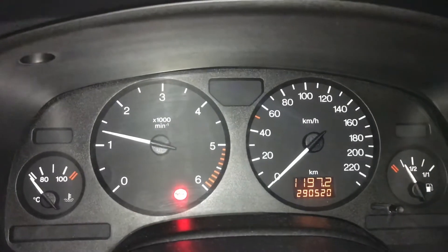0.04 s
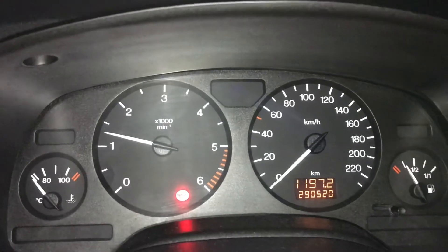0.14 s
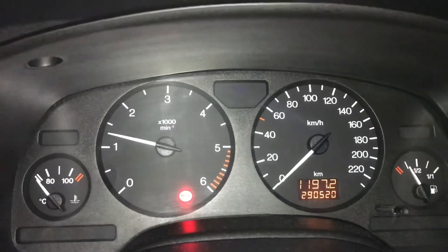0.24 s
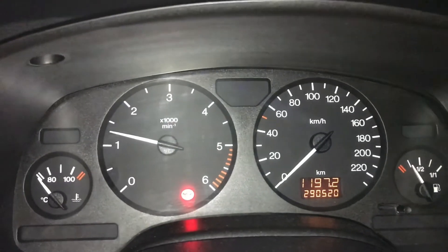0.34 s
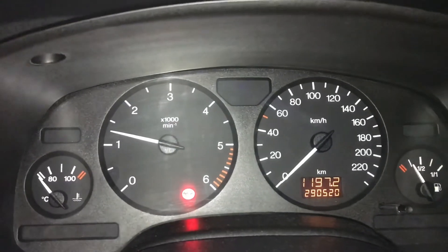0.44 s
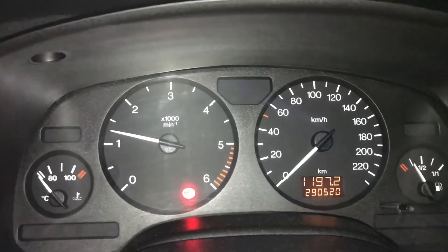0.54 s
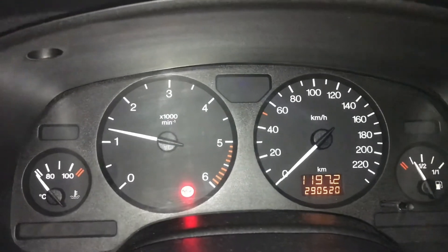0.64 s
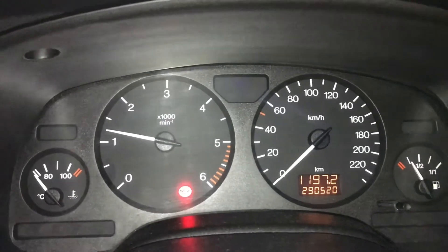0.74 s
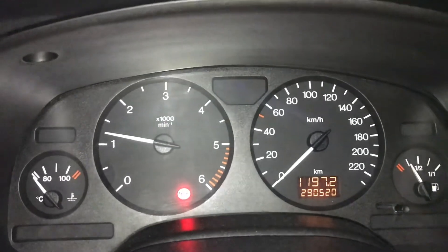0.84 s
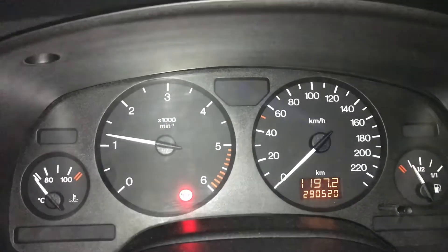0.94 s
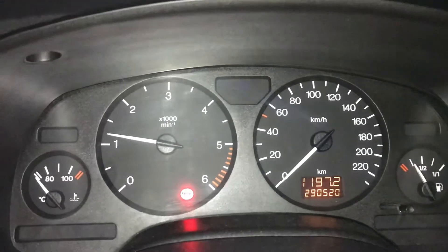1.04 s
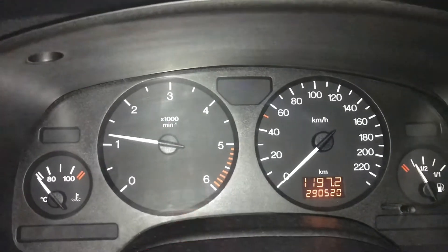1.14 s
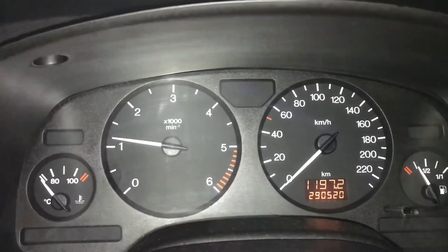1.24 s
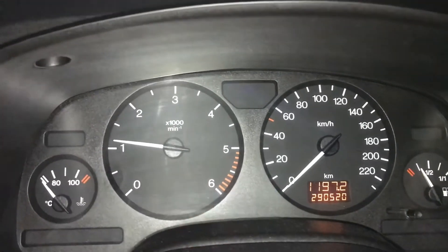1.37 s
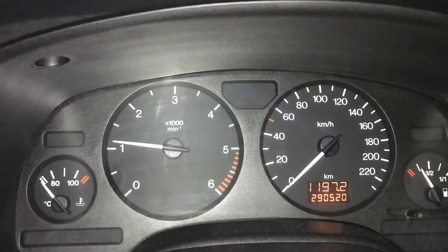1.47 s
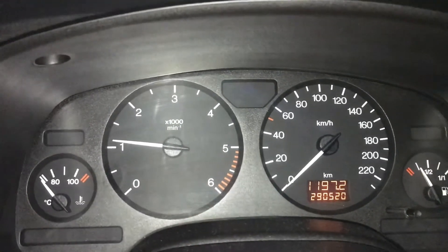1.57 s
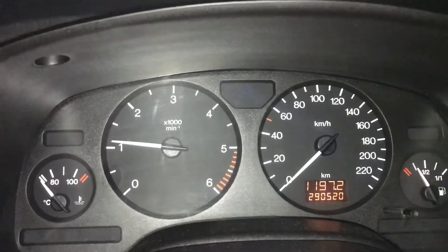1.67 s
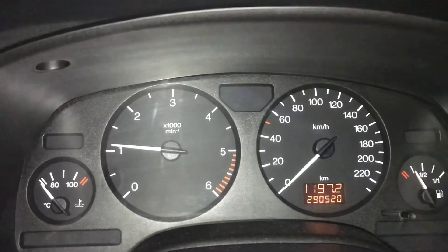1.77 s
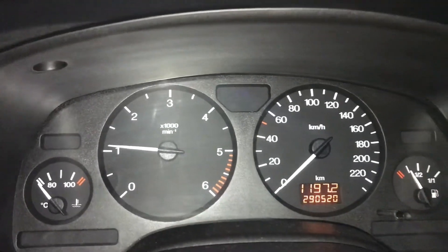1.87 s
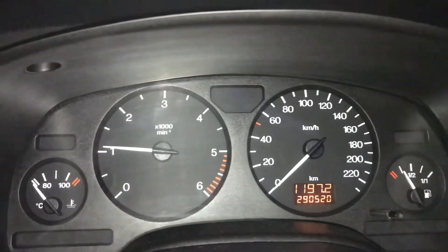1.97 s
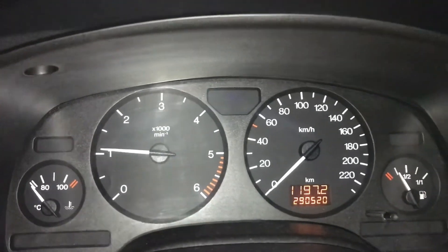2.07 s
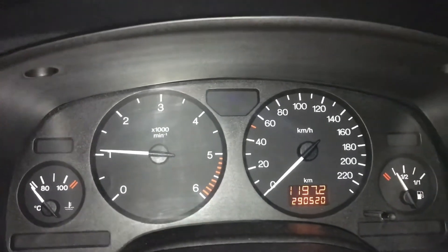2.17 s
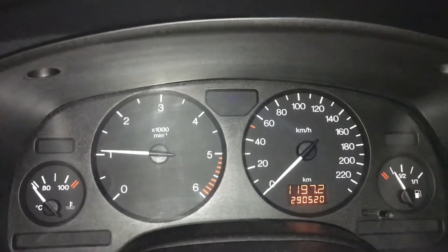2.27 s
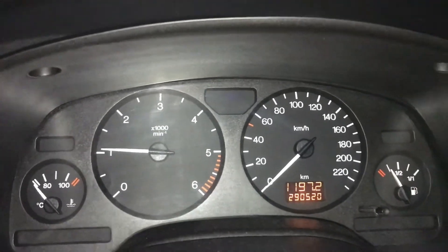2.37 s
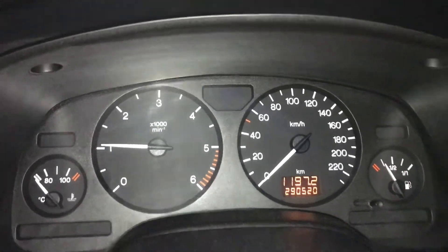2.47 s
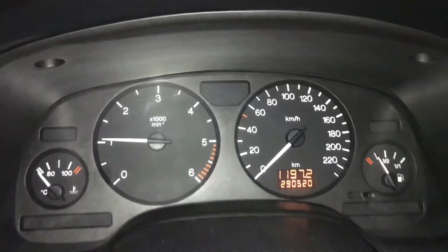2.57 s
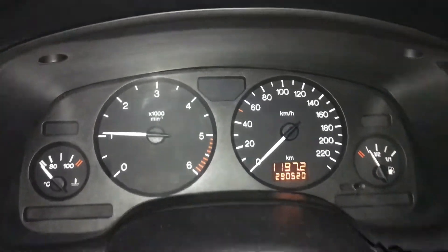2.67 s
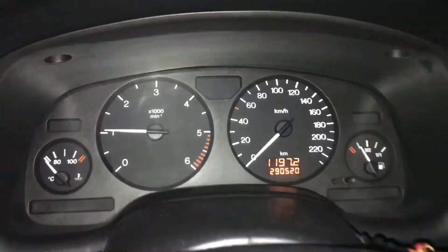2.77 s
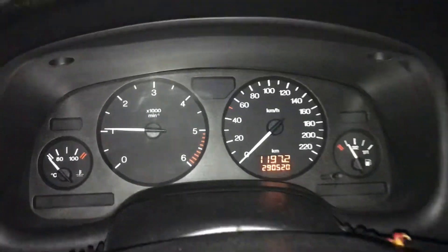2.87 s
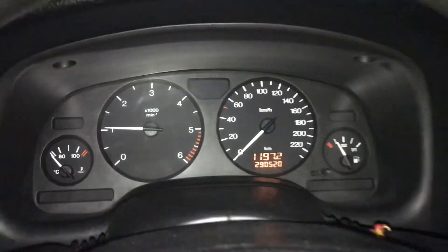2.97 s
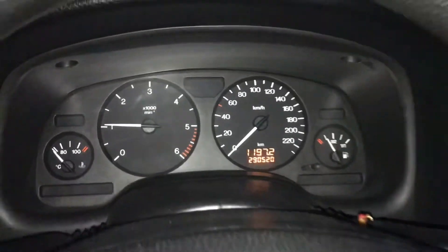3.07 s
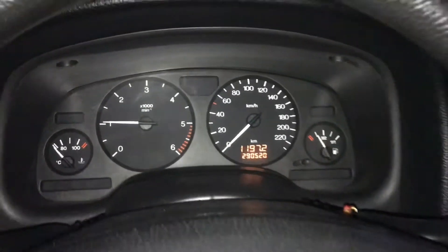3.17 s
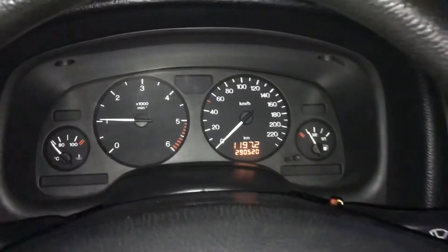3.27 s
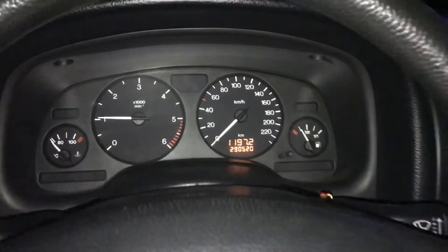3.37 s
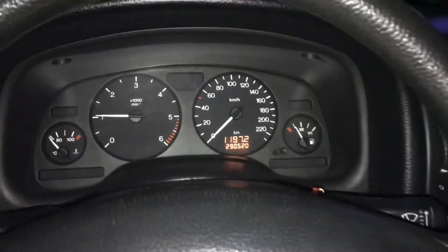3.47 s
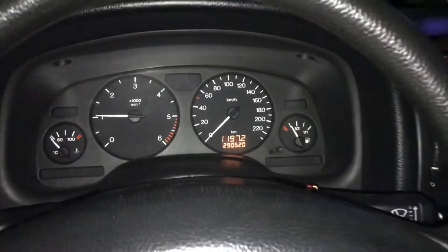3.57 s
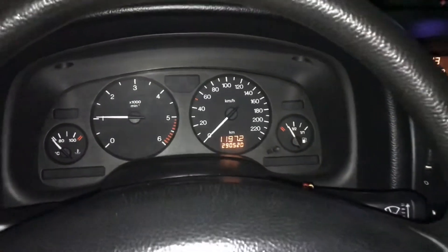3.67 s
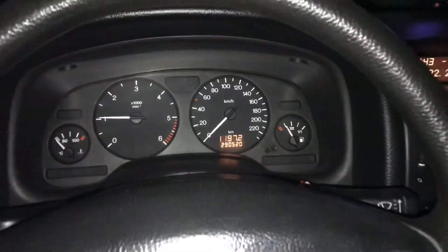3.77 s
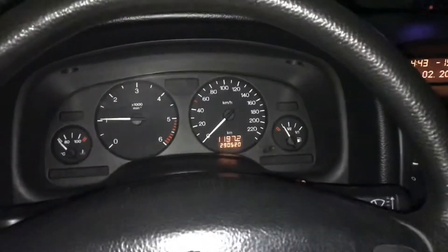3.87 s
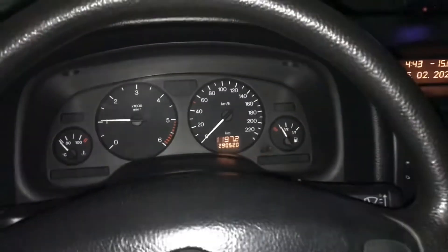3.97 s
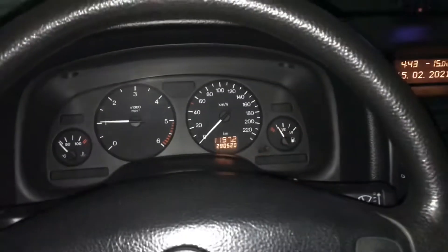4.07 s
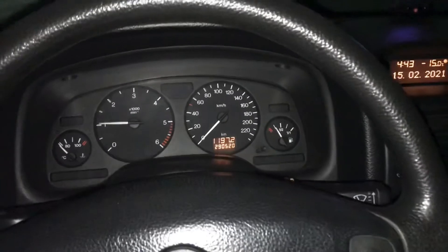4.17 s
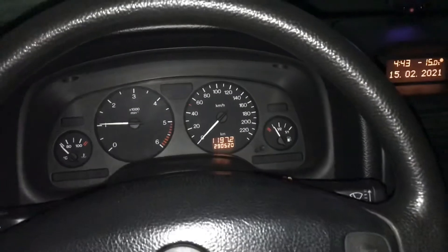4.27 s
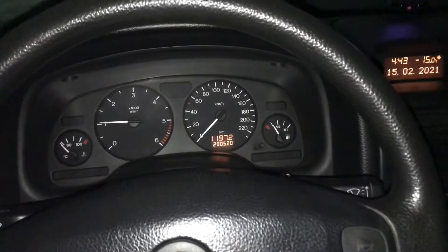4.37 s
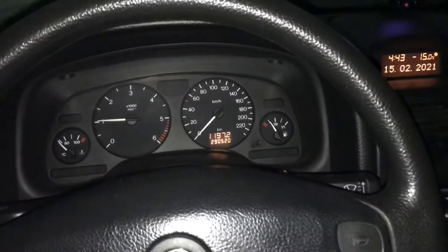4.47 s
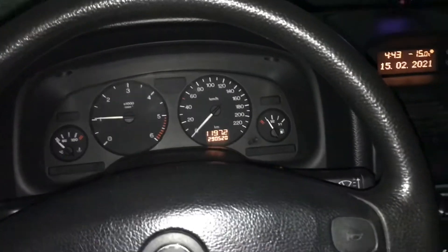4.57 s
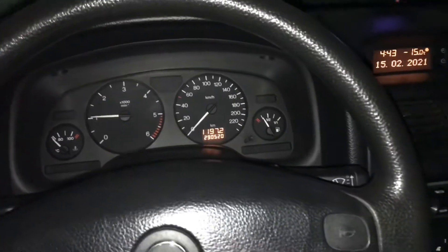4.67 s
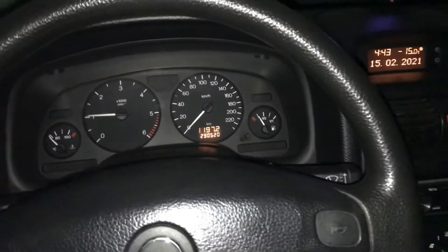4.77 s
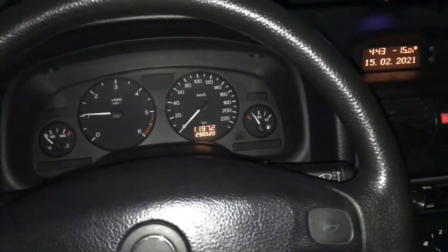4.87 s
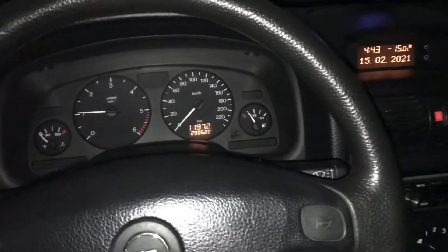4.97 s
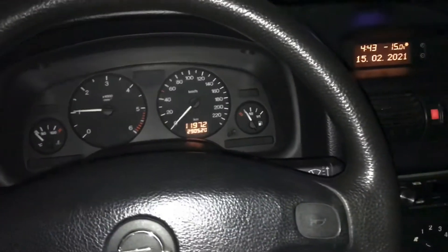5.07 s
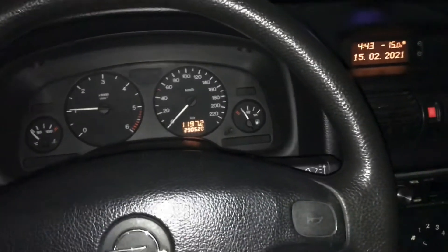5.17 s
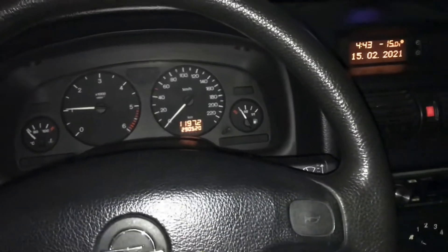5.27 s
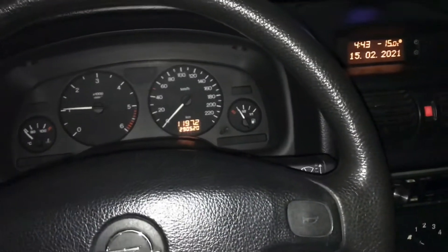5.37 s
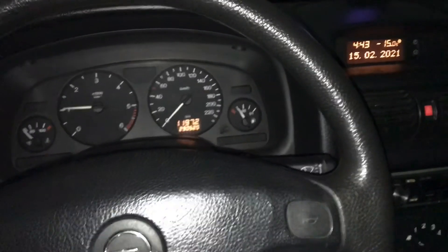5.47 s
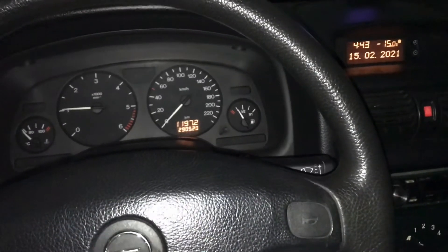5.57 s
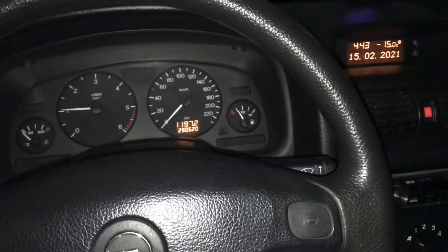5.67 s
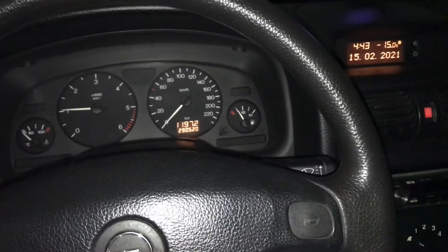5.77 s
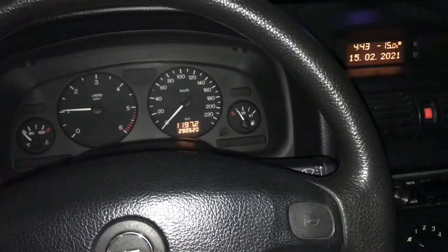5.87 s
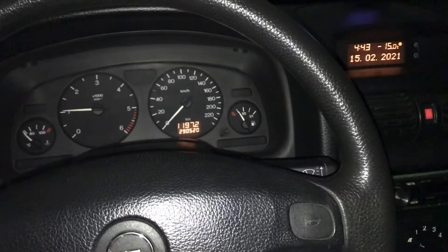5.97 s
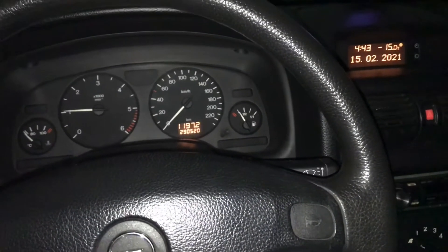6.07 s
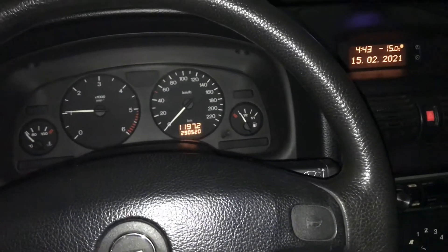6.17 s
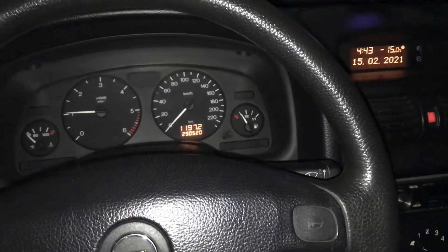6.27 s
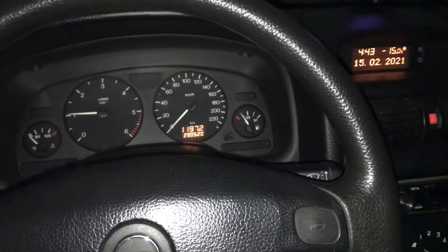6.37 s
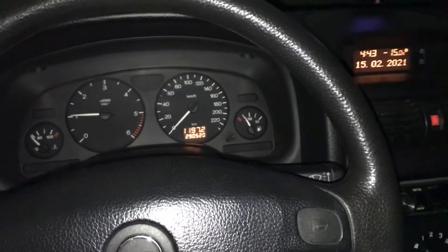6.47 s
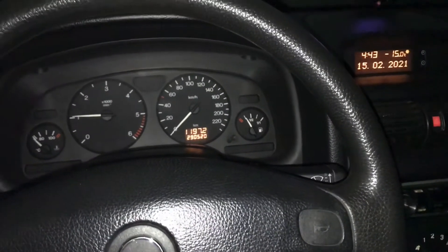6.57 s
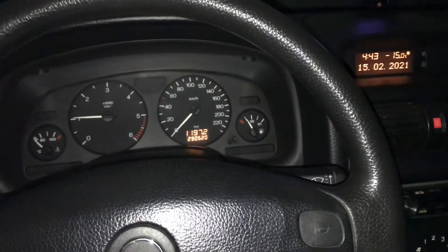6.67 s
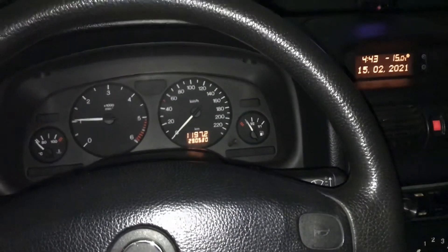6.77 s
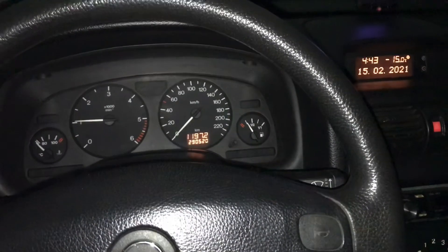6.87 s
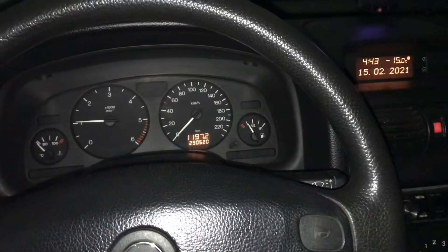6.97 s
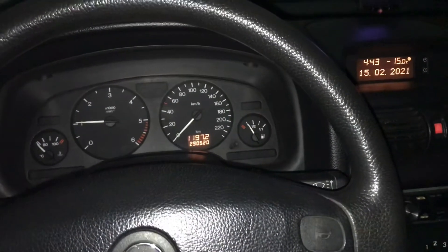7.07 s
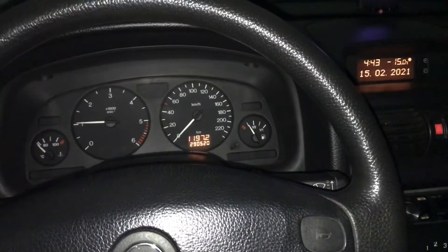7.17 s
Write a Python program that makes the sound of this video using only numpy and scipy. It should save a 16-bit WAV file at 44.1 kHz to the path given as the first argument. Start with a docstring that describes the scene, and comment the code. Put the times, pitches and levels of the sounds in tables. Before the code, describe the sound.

A cold four-cylinder diesel engine runs throughout, heard inside the car, with the microphone first near the dials. It begins at fast idle: a deep, pulsing cabin boom and droning panels, with combustion knock and fine injector ticks coming through the bulkhead. The key clicks lightly in the first 0.2 seconds. At about 0.45 seconds comes a soft, low thump with small plastic clicks; further faint clicks follow around 1.0, 1.3 and 2.7 seconds. The revs sink steadily until about 1.9 seconds, and loose trim buzzes briefly from 1.7 to 2 seconds. Just after that the knock loses its cold harshness and the engine settles into an even, slightly loping tickover. Between about 2.8 and 4.6 seconds the microphone moves back to the driver's seat, and the drone changes colour and softens slightly. The idle continues steadily over a very faint hiss until the end, at about 7.2 seconds.

```python
"""Cold diesel settling to idle

A four-cylinder diesel sinks from fast idle to tickover, heard inside the car. Firings make the cabin
boom and ring its panels; combustion knock and injector ticks come through the bulkhead. The key clicks
back, something thumps softly, trim buzzes at the lowest revs; then the mic moves from dials to seat."""
import sys
import numpy as np
from scipy import signal
from scipy.fft import rfft, irfft
from scipy.io import wavfile

SR = 44100
rng = np.random.default_rng(int(sys.argv[2]) if len(sys.argv) > 2 else 0)


def generate_wav(sig):
    """Save sig (samples, or channels by samples) to the path in sys.argv[1] as 16-bit PCM at SR."""
    pcm = np.round(np.clip(np.atleast_2d(sig).T, -1, 1) * 32767).astype(np.int16)
    wavfile.write(sys.argv[1], SR, pcm)


N = 318843
TIME = np.arange(N) / SR
FREQ = np.arange(N + 1) * SR / (2 * N)

# cylinders in firing order: dashboard push/dB, knock/dB, cold tick/dB, warm tick/dB, tick lead/s
CYLINDERS = [(-6, 0, -2, .5, .0065), (-12, -1, -3, -2, .0062), (-4.5, 1.5, 5.5, -2, .007),
             (0, 0, -1, 6.5, .0078)]


def undb(db):
    """Decibels to gain."""
    return 10 ** (np.asarray(db) / 20)


def unit(x):
    """Scale to rms 1."""
    return x / np.sqrt(np.mean(x ** 2))


def bump(centre_s, half_s):
    """Gaussian rise to 1 and back."""
    return np.exp(-((TIME - centre_s) / half_s) ** 2)


def ramp(start_s, length_s):
    """Linear move from 0 to 1."""
    return np.clip((TIME - start_s) / length_s, 0, 1)


def burst(start_s, decay_s):
    """Envelope: quick rise, exponential fall."""
    age = np.maximum(TIME - start_s, 0)
    return (1 - np.exp(-age / .00042)) * np.exp(-age / decay_s)


def level(revs, seat, base_db, fast_db, seat_db):
    """Gain: base_db at tickover by the dials, plus changes at fast idle and at the seat."""
    return undb(base_db + fast_db * revs + seat_db * seat)


def colour(points):
    """Minimum-phase response from an outline of f/Hz, level/dB."""
    hz, db = np.transpose(points)
    outline_db = np.interp(np.log(FREQ + 1), np.log(hz), db)
    cepstrum = irfft(np.log(undb(outline_db)))
    cepstrum[1:N] *= 2
    cepstrum[N + 1:] = 0
    return np.exp(rfft(cepstrum))


def mode(hz, width_hz):
    """One resonance, gain 1 at its centre."""
    return 1j * FREQ * width_hz / (hz ** 2 - FREQ ** 2 + 1j * FREQ * width_hz)


def ringing(modes):
    """Gain of a group of steep-skirted resonances."""
    return sum(undb(db) * np.abs(mode(hz, width_hz)) ** 2 for hz, width_hz, db in modes)


def through(x, response):
    """Filter by a response, then scale to rms 1."""
    return unit(irfft(rfft(x, 2 * N) * response)[:N])


def noise(points):
    """Coloured noise, rms 1."""
    return through(rng.standard_normal(N), colour(points))


def blows(times, db):
    """One impulse at each time."""
    at = np.round(times * SR).astype(int)
    inside = (at >= 0) & (at < N)
    return np.bincount(at[inside], undb(db)[inside], N)


def gate(times, db, rise_s, decay_s, bed):
    """Envelope: a swell at each time over a steady bed."""
    swell = (1 - np.exp(-TIME / rise_s)) * np.exp(-TIME / decay_s)
    return unit(through(blows(times, db), rfft(swell, 2 * N)) + bed)


def scatter(decay_s, size=8192):
    """Dense echoes in metal: they smear a blow in time with a nearly flat spectrum."""
    echoes = rfft(rng.standard_normal(size) * np.exp(-TIME[:size] / decay_s))
    return irfft(echoes / np.abs(echoes) ** .8) * (1 - np.arange(size) / size)


def shake(fired, cylinder, db, decay_s, own_db, jitter_s, uneven_db):
    """Blows through the metal; each cylinder's path departs from the mean path by own_db."""
    chance = rng.standard_normal((len(fired), 2))
    times, db = fired + jitter_s * chance[:, 0], db + uneven_db * chance[:, 1]
    own = np.array([scatter(decay_s) for _ in CYLINDERS])
    paths = scatter(decay_s) + undb(own_db) * (own - own.mean(axis=0))
    trains = [blows(times[cylinder == k], db[cylinder == k]) for k in range(len(CYLINDERS))]
    return unit(sum(signal.oaconvolve(train, path)[:N] for train, path in zip(trains, paths)))


def hiss():
    """Faint hiss with a few soft swells."""
    swells = [(.05, .25, 2.5), (1.18, 0.41, 8), (2.45, 0.35, 5), (3.5, 1, 4.5)]  # t/s, half width/s, rise/dB
    spectrum = [(100, -4.5), (2000, 5.5), (5000, 5), (7000, 5), (7800, -0.5), (9200, 3), (10400, -5),
                (11500, 0.5), (15000, -4.5)]  # f/Hz, level/dB
    rise_db = sum(db * bump(t, half_s) for t, half_s, db in swells)
    return undb(-86.5 + rise_db) * noise(spectrum)


def fittings(fired):
    """Key and dashboard plastic click; loose trim taps once a firing at the lowest revs."""
    events = [(.006, -58, 0.0064, 5.5), (.12, -64, .0059, -7), (.133, -53, 0.0055, -9),
              (.157, -67, 0.0039, -10), (.4255, -66.5, 0.014, 8), (.453, -70, 0.0046, -17),
              (.475, -73, .018, -11), (1.044, -68, .004, 13), (1.2763, -64, 0.0091, 12.5),
              (2.67, -77.5, 0.036, 16)]  # clicks: t/s, level/dB, decay/s, dull share/dB
    # spectra of sharp plastic, a dull knock on it and ringing trim: f/Hz, level/dB
    sharp_eq = [(1500, 1.5), (3600, -14), (4080, 8.5), (4400, 0.5), (4650, 1), (5300, -0.5), (7300, -7),
                (8200, -4), (10400, -10), (11500, -4), (15000, -16)]
    dull_eq = [(400, -23), (750, -7), (1400, 12.5), (2200, -5.5), (3200, -4.5), (5000, -46), (9000, -29)]
    trim_eq = [(1500, -10), (2200, 6), (2700, 5), (3000, 0), (3300, 0), (3800, 3), (4400, 3), (4750, -16),
               (5800, -5), (8000, -22), (15000, -35)]
    sharp, dull, trim = noise(sharp_eq), noise(dull_eq), noise(trim_eq)
    clicks = sum(undb(db) * burst(t, decay_s) * (sharp + undb(dull_db) * dull)
                 for t, db, decay_s, dull_db in events)
    from_s, until_s, lag_s = 1.66, 1.945, .0145
    taps = fired[(fired > from_s) & (fired < until_s)] + lag_s
    gains = undb(-67 + 4 * rng.standard_normal(len(taps)))
    buzz = sum(gain * (trim * burst(t, decay_s=.011) + undb(-4.5) * sharp * burst(t, decay_s=.006))
               for t, gain in zip(taps, gains))
    return clicks + buzz


def thump(at_s=.442, pulse_hz=118, panel_hz=270):
    """One soft thump sets the dashboard panel ringing."""
    age = TIME - at_s
    pulse = -undb(-26.5) * np.exp(-np.abs(age) / .0074) * np.cos(2 * np.pi * pulse_hz * age)
    ring = undb(-42.5) * burst(at_s - .01, decay_s=.025) * np.sin(2 * np.pi * panel_hz * age)
    return pulse + ring


def injection(fired, cylinder, revs, seat):
    """Each injector ticks just ahead of its firing, in its own voice; something whistles faintly."""
    modes = [(3085, 45, 10), (3168, 93, 8), (3360, 70, 8), (3600, 40, 1), (3880, 120, -16.5),
             (5230, 160, -9.5), (5350, 210, -12), (6350, 140, -18.5), (9300, 1300, -20)]  # injectors and pipes: f/Hz, width/Hz, level/dB
    tick_eq = [(1500, -13), (2700, -28.5), (3300, -8.5), (4300, -35), (6800, -24.5), (7600, -24.5),
               (10500, -30.5), (12000, -22.5), (15000, -36)]  # hiss between the modes: f/Hz, level/dB
    cold_db, warm_db, lead_s = np.array(CYLINDERS)[cylinder, 2:].T
    # warming passes the loudest tick from one injector to the next
    warmth = np.interp(fired, TIME, ramp(start_s=1.2, length_s=2.6))
    tick_db = cold_db + (warm_db - cold_db) * warmth
    needles = shake(fired - lead_s, cylinder, tick_db,
                    decay_s=.004, own_db=-5, jitter_s=.00025, uneven_db=1)
    ticks = through(needles, np.abs(colour(tick_eq)) + ringing(modes))
    whistle = through(rng.standard_normal(N), mode(hz=4500, width_hz=64) ** 2)
    return (ticks * level(revs, seat, base_db=-78.5, fast_db=-1, seat_db=-2.9)
            + whistle * level(revs, seat, base_db=-105, fast_db=-2.5, seat_db=8.5))


def knock(fired, cylinder, revs, seat):
    """The charge burns with a knock that rings the block and is harsher while cold."""
    modes = [(1240, 33, -14), (1250, 50, 1.5), (1386, 56, 1), (1923, 57, -3), (2040, 79, -5)]  # engine block: f/Hz, width/Hz, level/dB
    # spectra of knock through the bulkhead and of the harsh burn: f/Hz, level/dB
    knock_eq = [(150, -13), (300, 6), (600, 6.5), (950, 1.5), (1170, -13), (1400, -4), (1700, -5.5),
                (2050, -9.5), (2400, -15.5), (2900, -15.5), (3800, -18.5), (5000, -29.5), (8000, -38.5)]
    harsh_eq = [(1200, 3), (1800, 6), (2700, 0.5), (3400, 3.5), (4200, -9.5), (5600, -13), (7700, -23),
                (9000, -16.5), (10500, -44), (15000, -60)]
    knock_db = np.array(CYLINDERS)[cylinder, 1]
    burn_db, harsh_db = knock_db + ([.27, 1] * rng.standard_normal((len(fired), 2))).T
    burn = noise(knock_eq) * gate(fired - .005, burn_db, rise_s=.0079, decay_s=.006, bed=1)
    metal = shake(fired - .007, cylinder, knock_db,
                  decay_s=.021, own_db=-2.5, jitter_s=.00006, uneven_db=1.33)
    block = through(metal, np.abs(colour(knock_eq)) + ringing(modes))
    harsh = noise(harsh_eq) * gate(fired - .011, harsh_db, rise_s=.0026, decay_s=.034, bed=5.4)
    return (burn * level(revs, seat, base_db=-64, fast_db=-2.3, seat_db=.3)
            + block * level(revs, seat, base_db=-64.5, fast_db=-2.6, seat_db=.7)
            + harsh * undb(-71 - 10 * ramp(start_s=2, length_s=.23)))


def dashboard(fired, cylinder, revs, seat):
    """One cylinder pushes hardest, so a low panel mode throbs once a cycle."""
    push_db = np.array(CYLINDERS)[cylinder, 0] + .5 * rng.standard_normal(len(fired))
    panel = mode(hz=281.5, width_hz=21) * mode(hz=295, width_hz=170)
    ring = through(blows(fired - .004, push_db), panel)
    return ring * level(revs, seat, base_db=-54, fast_db=-6, seat_db=-2.64)


def drone(fired, cylinder, revs, seat):
    """Firings ring the body with a lope once a cycle; other panels take over as the mic moves back."""
    body_eq = [(110, -33), (150, -2), (200, 8.5), (245, -4), (310, 6.5), (400, 0), (490, -2), (540, -6.5),
               (680, -7.5), (850, -11.5), (950, -11), (1000, -14), (1060, -10.5), (1170, -14.5),
               (1300, -13), (2200, -48)]  # path through the body: f/Hz, level/dB
    # panel modes heard by the dials and at the seat: f/Hz, width/Hz, level/dB
    dial_modes = [(735.7, 53.5, 1.5), (880.5, 27, -9.5), (914, 51, -9.5), (1003, 42, -11), (430, 36, -4),
                  (303, 31, -3), (1300, 440, -21)]
    seat_modes = [(574, 6.5, -3), (614.4, 41, 0), (625, 32, -12.5), (781.7, 13, -10), (806, 22, -3.5),
                  (333, 18, -0.5), (428, 15, -11), (1080, 34, -12)]
    lope_db = .058 * np.array(CYLINDERS)[cylinder, 0]
    loping = shake(fired, cylinder, lope_db, decay_s=.03, own_db=4.5, jitter_s=.00004, uneven_db=.5)
    even = shake(fired, cylinder, 0, decay_s=.029, own_db=-9, jitter_s=.00004, uneven_db=1)
    rough = 1.2 * np.exp(-TIME / 1.5) * rng.standard_normal(N)  # uneven burn of the first cold firings
    body = through(loping + rough, colour(body_eq))
    dial_panels = through(even + .5 * rough, ringing(dial_modes))
    seat_panels = through(even, ringing(seat_modes))
    return (body * level(revs, seat, base_db=-58, fast_db=.5, seat_db=-1.5)
            + dial_panels * level(revs, seat, base_db=-58, fast_db=.64, seat_db=-18.5)
            + seat_panels * level(revs, seat, base_db=-67.5, fast_db=-4, seat_db=6.2))


def boom(firings, rate_hz, revs, seat):
    """The shaking engine pumps the cabin air at firing-rate harmonics; unequal cylinders rock it."""
    cabin = [(34.76, -43.5, -48, -46.5, -53.5), (35.61, -42.5, -47.5, -47, -64),
             (36.4, -37, -41.5, -55, -53.5), (37.8, -31.5, -47.5, -55, -61), (39.77, -31, -43.5, -66, -71),
             (39.84, -29, -47.5, -53, -63.5), (42.2, -28.5, -45.5, -53.5, -68)]  # cabin boom: firing rate/Hz, then level/dB of each harmonic
    dips = [(.82, 0.058, -2), (1.16, 0.031, -6.5)]  # brief dips of the fundamental: t/s, half width/s, change/dB
    rocking_orders = [(5, -56.5), (10, -61), (14, -63.5), (15, -62.5), (16, -57)]  # multiple of the four-firing cycle, level/dB
    rumble_eq = [(18, 1.5), (35, -15.5), (60, .5), (130, 4), (190, -5), (260, -5),
                 (400, -24.5), (1500, -80)]  # f/Hz, level/dB
    harmonics, seat_change_db = [1, 2, 3, 5], [-1.5, -1.4, .45, -3]
    rates_hz, *columns = np.transpose(sorted(cabin))
    levels_db = [np.interp(rate_hz, rates_hz, db) + change_db * seat
                 for db, change_db in zip(columns, seat_change_db)]
    levels_db[0] += sum(db * bump(t, half_s) for t, half_s, db in dips)
    # the cabin shifts higher harmonics more, spreading each firing out, most by the dials
    spread = .14 - .081 * seat
    pumping = sum(undb(db) * np.cos(2 * np.pi * (k * firings + spread * (k - 1) ** 2))
                  for k, db in zip(harmonics, levels_db))
    cycles = firings / len(CYLINDERS)
    rocking = sum(undb(db) * np.cos(2 * np.pi * (k * cycles + rng.random())) for k, db in rocking_orders)
    rumble = noise(rumble_eq) * level(revs, seat, base_db=-55.5, fast_db=2.6, seat_db=-.92)
    return np.sqrt(2) * (pumping + rocking) + rumble


def scene():
    """The crankshaft times the engine sounds; its speed and the mic position set their levels."""
    speed = [(0, 41.99), (.17, 42.25), (.65, 39.38), (1.15, 36.99), (1.35, 36.64), (1.9, 34.56),
             (2.3, 35.31), (2.8, 34.8), (3.9, 35.33), (4.9, 35.56), (5.5, 35.32), (7.23, 35.36)]  # engine speed: t/s, firing rate/Hz
    tickover_hz, fast_idle_hz = 35.3, 42.2
    rate_hz = np.interp(TIME, *np.transpose(speed))
    firings = .09 + np.cumsum(rate_hz) / SR  # running count
    number = np.arange(1, int(firings[-1]) + 1)
    fired = np.interp(number, firings, TIME)  # firing times/s
    cylinder = number % len(CYLINDERS)
    revs = (rate_hz - tickover_hz) / (fast_idle_hz - tickover_hz)
    seat = ramp(start_s=2.84, length_s=1.8)  # mic position: 0 dials, 1 driver's seat
    engine = boom(firings, rate_hz, revs, seat)
    engine += sum(part(fired, cylinder, revs, seat) for part in (drone, dashboard, knock, injection))
    return (engine + fittings(fired) + thump() + hiss())[None]


def record(dry):
    """The mic cuts the top treble steeply."""
    cutoff_hz = 15400
    return signal.sosfilt(signal.ellip(8, .2, 70, cutoff_hz, fs=SR, output="sos"), dry)


dry = scene()
out = record(dry)
generate_wav(out)
```